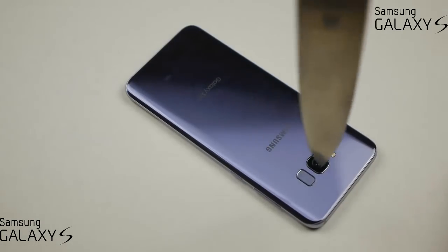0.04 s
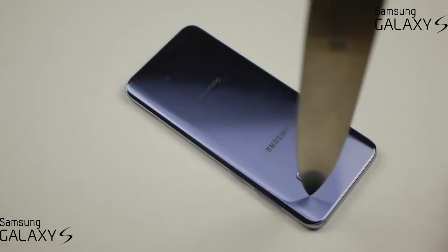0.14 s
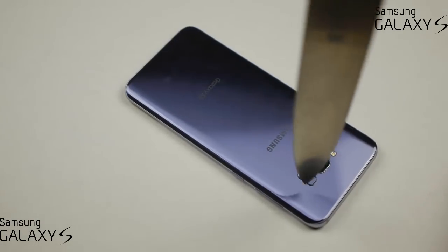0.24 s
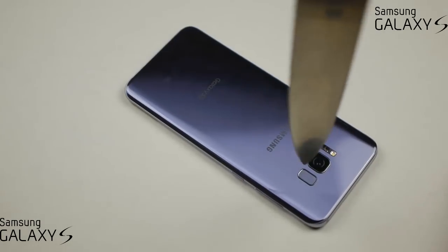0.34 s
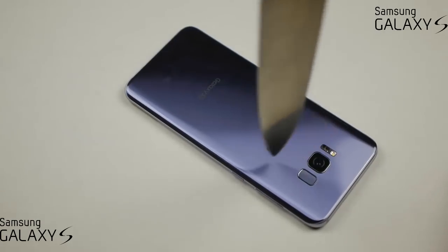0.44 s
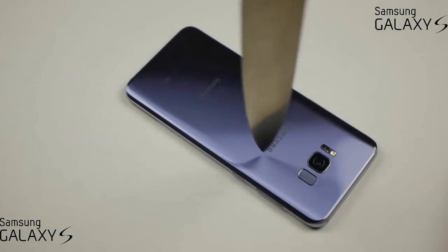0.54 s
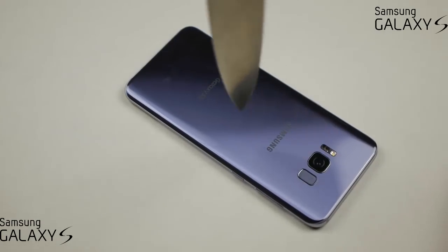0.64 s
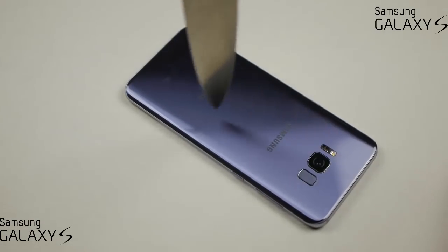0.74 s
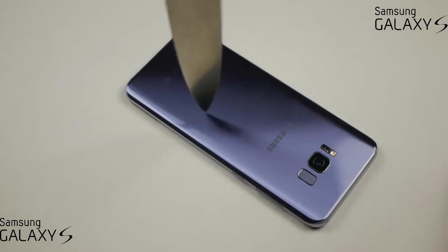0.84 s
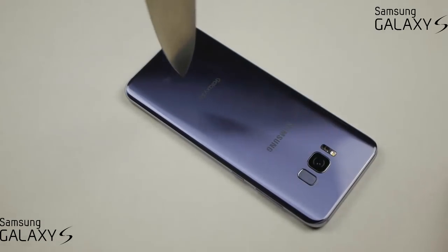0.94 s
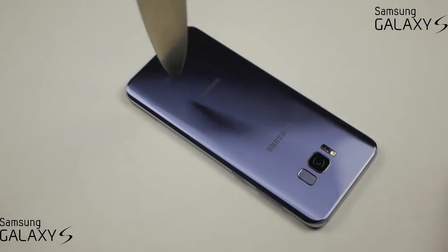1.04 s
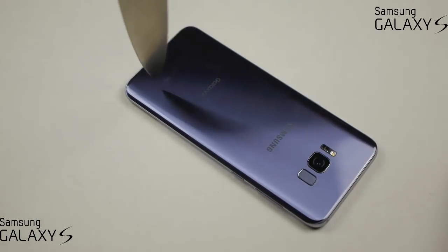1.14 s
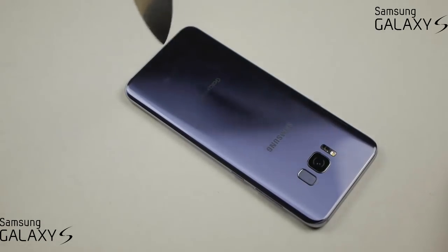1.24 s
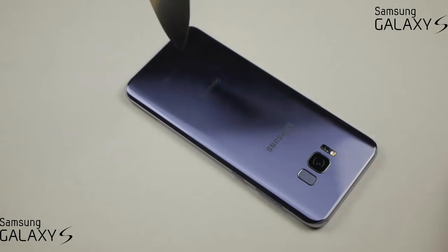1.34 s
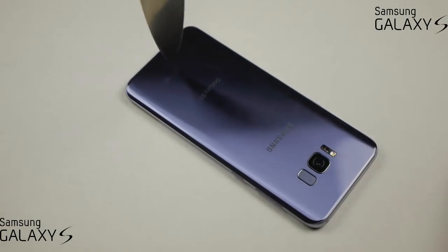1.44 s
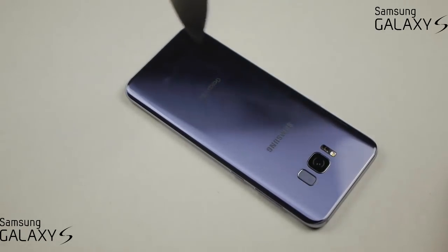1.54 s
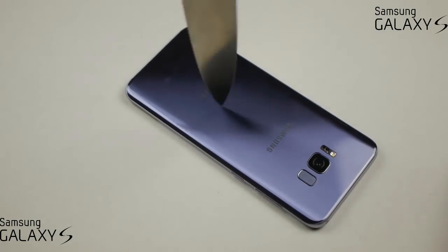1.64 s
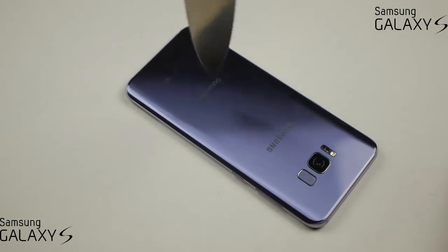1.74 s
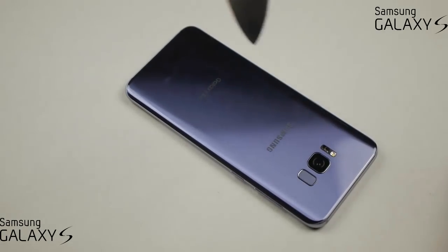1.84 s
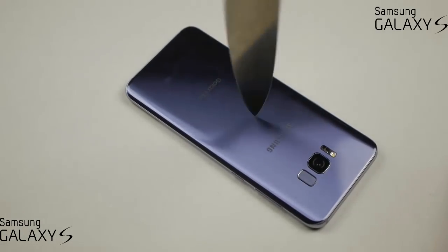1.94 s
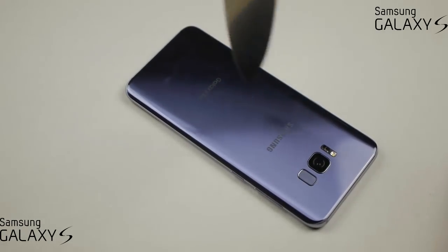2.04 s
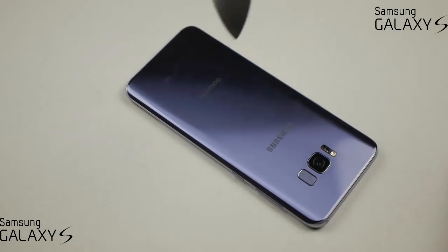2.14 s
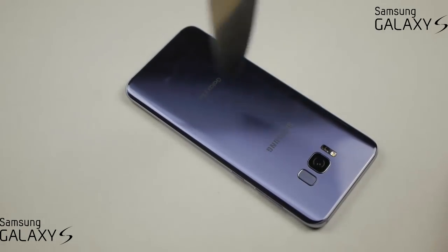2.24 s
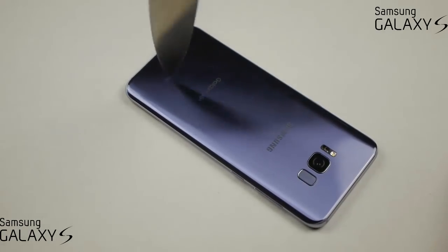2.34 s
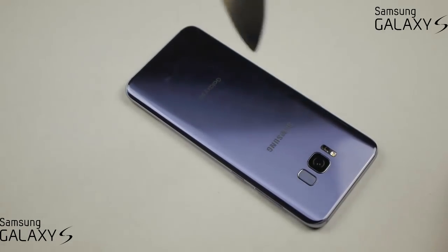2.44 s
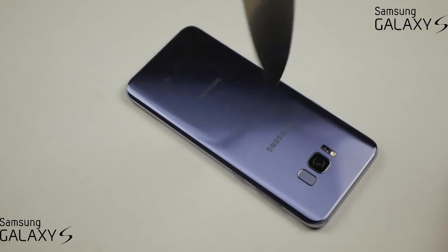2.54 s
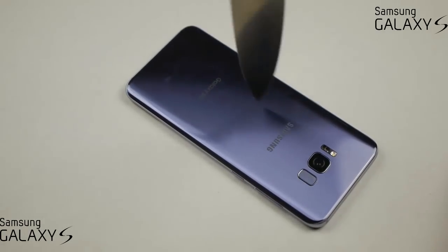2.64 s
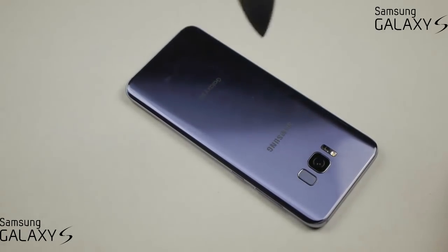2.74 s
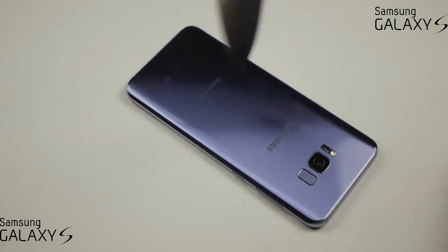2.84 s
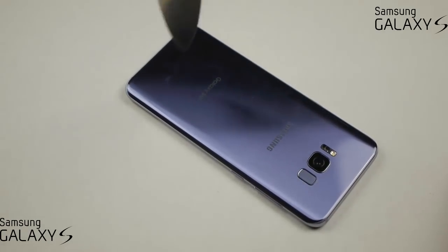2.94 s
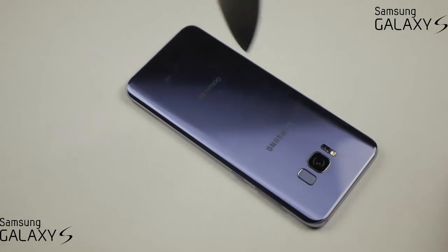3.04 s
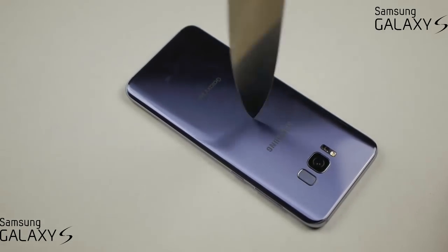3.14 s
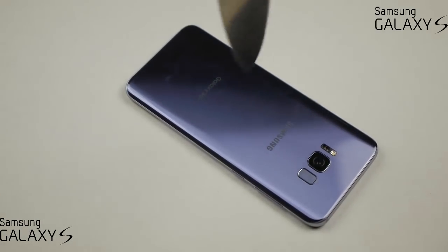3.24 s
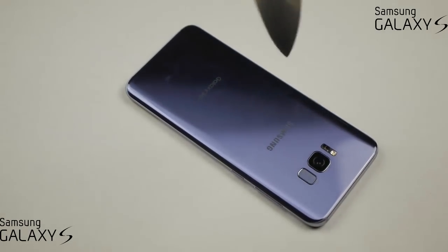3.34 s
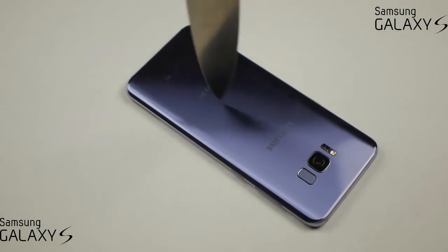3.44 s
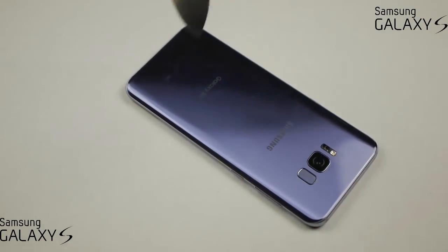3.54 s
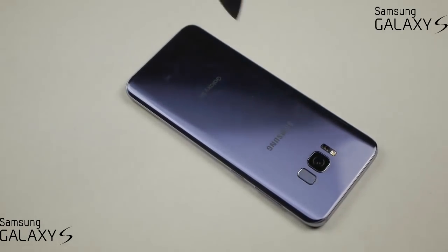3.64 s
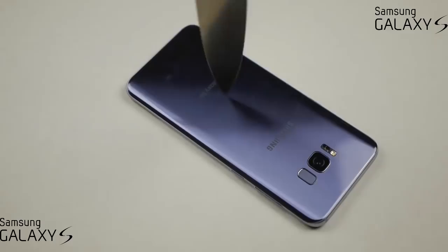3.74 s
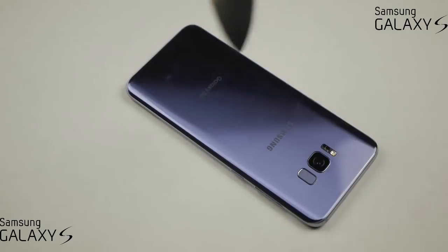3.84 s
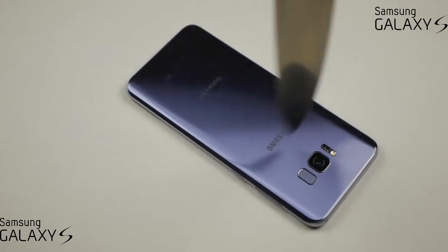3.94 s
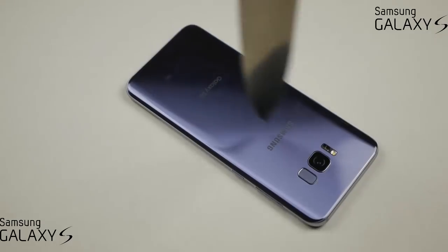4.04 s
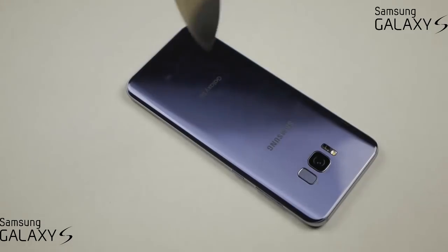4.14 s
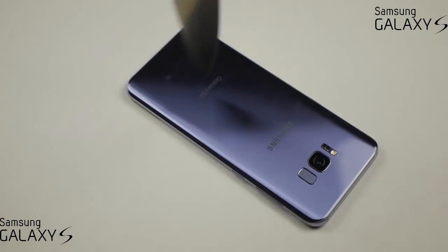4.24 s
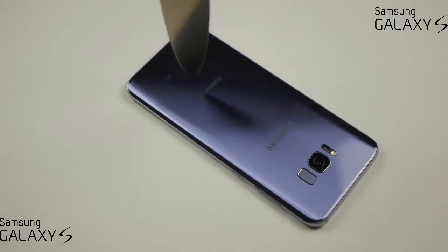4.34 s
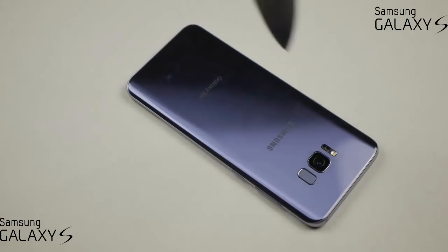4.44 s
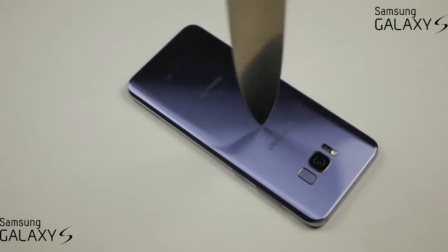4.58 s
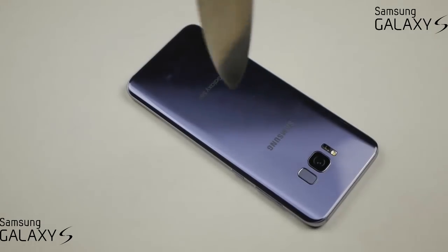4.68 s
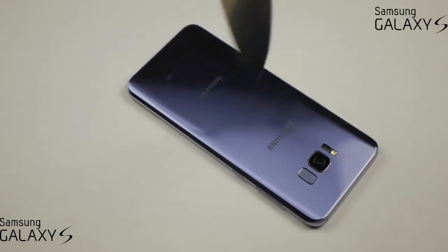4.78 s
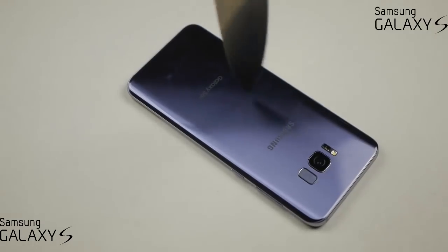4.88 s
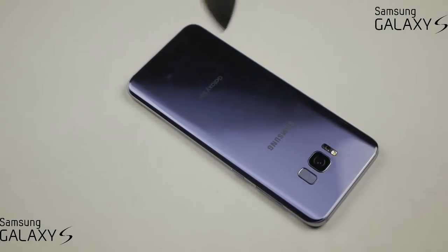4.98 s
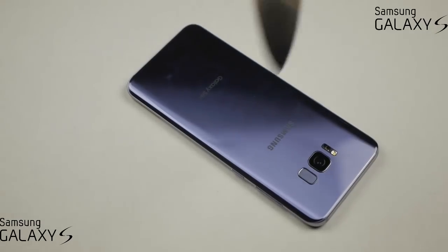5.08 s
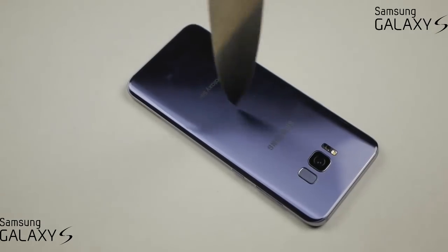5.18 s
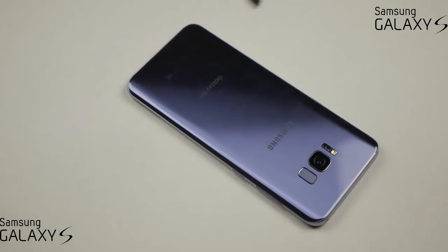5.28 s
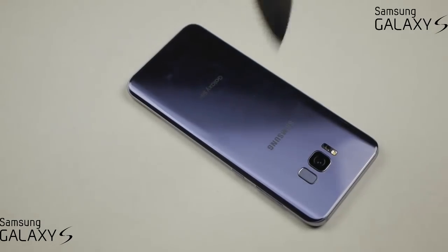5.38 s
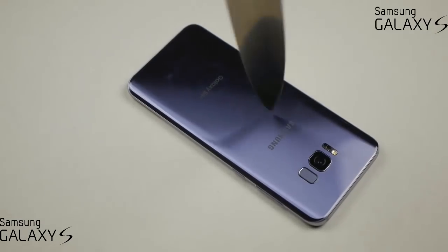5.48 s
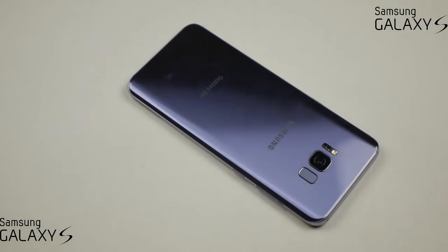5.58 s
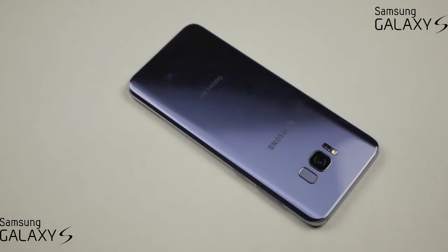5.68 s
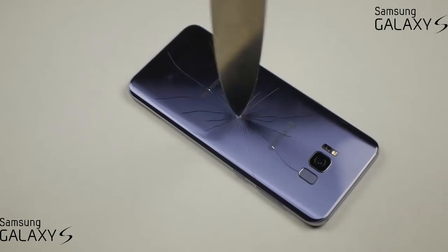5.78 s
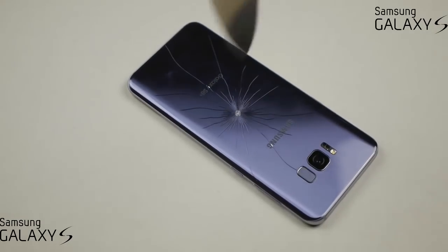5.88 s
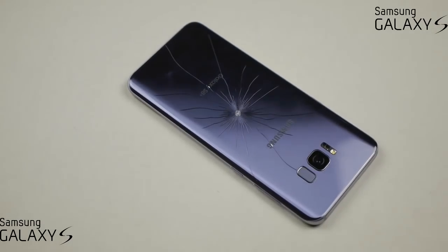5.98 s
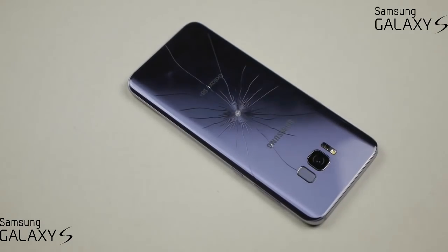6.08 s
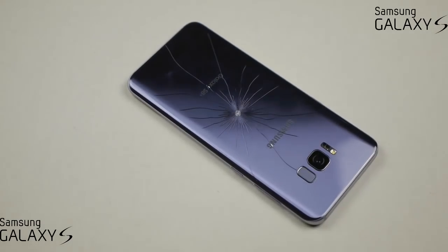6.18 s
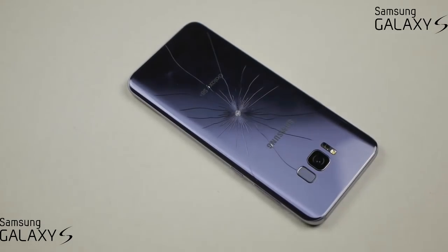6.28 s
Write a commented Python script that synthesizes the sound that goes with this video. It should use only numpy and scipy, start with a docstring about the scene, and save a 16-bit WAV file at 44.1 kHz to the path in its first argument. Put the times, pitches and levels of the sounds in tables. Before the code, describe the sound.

In a small, quiet room, closely miked in stereo, a steel knife tip raps on the glass back of a phone lying on a table. The tail of one blow is heard at 0 seconds, then duller jabs at about 0.3 and sharper ones at 0.6 and 0.9, continuing evenly every 0.3 seconds. Each is a very short, hard tick, a compact hollow thump of the tabletop slightly overloading the microphone, a brief chatter of the phone, and faint rings of case and blade, followed by short room reflections. From about 1.8 seconds the blows are fuller; from 3.8 to 5.5 they generally rattle more. At 5.87 the last jab has less thump but a harsh clatter and a bright glass snap with fine splinters; at 5.91 the crack runs on with a thin, very high ring. It fades quickly into faint room air until about 6.4.

```python
"""Small room: a steel knife tip jabs again and again at the glass back of a phone lying on a table.
Each jab is a noise tick on the glass, a table thump of dying sines that overloads the microphone,
a chattering noise buzz of the phone, and rings of its case and the blade; the room answers.
On the last blow the glass breaks with noise snaps and splinters; a moment later the crack runs on
with a thin, high ring of sines. Faint steady noise is the air of the room."""
import sys
import numpy as np
from scipy import signal
from scipy.fft import rfft, irfft
from scipy.io import wavfile
from scipy.ndimage import uniform_filter1d

SR = 44100
rng = np.random.default_rng(int(sys.argv[2]) if len(sys.argv) > 2 else 0)


def store_pcm(level_fs):
    """Save levels as 16-bit WAV."""
    pcm = np.round(np.clip(level_fs, -1, 1) * 32767).astype(np.int16)
    wavfile.write(sys.argv[1], SR, np.atleast_2d(pcm).T)


N = 278445

# Jabs, all levels relative; the lean tilts the modes and is scaled where used:
# start_s, blow_db, lean_db_per_octave, tick_db, rattle_db, favoured_hz, muted_hz
JABS = [(-0.06, -3.5, -4.5, 6, -2, 2620, 1920), (0.2654, -4.5, -9, -6.5, 5, 2650, 1740),
        (0.582, -1.9, 0, -3, -2.5, 2480, 1670), (0.876, -1.5, -1, -4.5, -3.5, 6600, 1940),
        (1.1779, -3.5, -3.5, -3, 1, 1360, 2000), (1.4728, -2, -2.5, 1.5, 3.5, 7140, 11000),
        (1.7552, 1, -0.5, 1, 0.5, 1730, 5100), (2.0585, 0, -1.5, 4.5, 2.5, 2430, 1370),
        (2.3797, 0, 0.2, 4, -1.5, 2860, 2100), (2.6761, -1, 0, 1.5, -0.5, 8800, 4000),
        (2.97, -0.5, 2, 0, -0.5, 3000, 2100), (3.2295, -0.5, -1.5, -0.5, 1, 1920, 3300),
        (3.5147, 0.2, -.5, -0.5, 1, 3950, 2950), (3.8026, -0.2, 0.5, 0.5, 4, 2200, 5400),
        (4.0832, -0.8, 0.5, -3.5, 6, 2460, 9400), (4.3727, -1, 1.9, -1, 4.5, 1720, 2870),
        (4.6509, -0.5, -2, -6.5, 2, 4600, 3030), (4.923, -0.5, -0.5, -1.5, 4.5, 1650, 2900),
        (5.2239, -0.5, -1.7, -1.5, 6, 4170, 1970), (5.5216, 0.1, -1.9, -1, 7, 4100, 2000),
        (5.8711, -4.5, 1.5, 4.5, 9, 4380, 1750)]
# Table with the phone on it: mode_hz, level_db, t60_s
TABLE_MODES = [(196.8, 5, 0.083), (251.4, 5, 0.093), (284.4, 3, 0.082), (403, 0.5, 0.041),
               (744, -9.5, 0.027)]
# Phone case: mode_hz, level_db, t60_s
CASE_MODES = [(825, -17, 0.042), (1024, -18.5, 0.024), (1421, -29.5, 0.072)]
# Knife blade, before random share and detuning: mode_hz, level_db, t60_s
BLADE_MODES = [(3900, -47, .07), (4850, -48, 0.12), (7300, -50.5, .05), (8800, -56, 0.049),
               (10231, -52, 0.076), (11200, -52, 0.065), (13484, -47, 0.041), (14867, -54.5, .07)]
# Glass splitting, relative levels: start_s, snap_db, ring_db
CRACKS = [(5.8695, -17, -15), (5.913, -26.5, 5)]
# Cracked glass: mode_hz, level_db, t60_s
GLASS_MODES = [(7779, -48, .17), (9060, -44, 0.23), (9040, -49, 0.32), (10300, -37, 0.14),
               (11460, -50, .16), (12910, -45, 0.3), (13060, -52.5, .25), (13480, -51, .22),
               (14580, -41.5, .09), (15640, -50, .06)]
# Standing waves of the room: mode_hz, level_db, t60_s
ROOM_MODES = [(131, -17, 0.14), (140.1, -20, 0.31), (156.14, -21.5, 0.31), (167.3, -16, 0.19),
              (186.7, -1.5, 0.089), (193.7, -18, 0.26), (236.8, -17.5, 0.21), (244.4, -12, 0.22),
              (271.3, -11, 0.12), (277.8, -18, 0.41), (297, -20, 0.36), (308.8, -10.5, 0.14),
              (315.1, -32, 0.86), (324.5, -7.5, 0.13), (336.5, -5, 0.12), (343, -9, 0.1), (352, -8.5, 0.23),
              (371, -5, 0.17), (387, -2.5, 0.098), (426, -36, 0.17), (412.6, -29, 0.2),
              (422.4, -28.5, 0.56), (452.2, -8, 0.09), (468, -24.5, 0.45), (476.4, -1.5, 0.085),
              (494.4, -26, 0.48), (506, -35, 0.58), (518.6, -13.5, 0.072), (554.3, -25.5, 0.2),
              (579.5, -26.5, 0.11)]
# Noise spectrum of the tip on glass, relative: freq_hz, density_db_per_hz
TICK_COLOUR = [(300, 1), (800, 5), (1800, -0.5), (3000, -7.5), (5500, -8), (9000, -6.5), (13000, -11.5),
               (15500, -10), (16500, -28.5)]
# Noise spectrum of the chattering phone, relative: freq_hz, density_db_per_hz
BUZZ_COLOUR = [(300, -22), (800, -0.5), (1200, -1), (2000, -1), (4000, -8), (7000, -10), (11000, -18),
               (15000, -19), (16500, -32.5)]
# Noise spectrum of the breaking glass, relative: freq_hz, density_db_per_hz
SNAP_COLOUR = [(1000, -10), (4000, -7), (8000, -10), (13500, 11.5), (15500, -6), (16500, -15.5)]
# Spectrum of the room's bass reflections, relative: freq_hz, density_db_per_hz
ROOM_BASS_COLOUR = [(30, -29), (85, -14), (125, -2.5), (220, 0.5), (320, 6), (480, -9), (620, -2.5),
                    (800, -8), (1100, -22.5), (1800, -22.5), (4000, -38.5)]
# Spectrum of the room's treble reflections, relative: freq_hz, density_db_per_hz
ROOM_TREBLE_COLOUR = [(400, 2), (900, 9), (1500, 3.5), (3200, 0), (5000, -5), (7000, -9.5), (10000, -16),
                      (13500, -18), (15000, -35.5), (16000, -46)]
# Spectrum of the room's steady air, relative: freq_hz, density_db_per_hz
AIR_COLOUR = [(25, -25), (110, -8), (300, -15.5), (700, -12.5), (2000, -18.5), (6000, -22.5), (12000, -28),
              (15000, -49.5)]
# Decay of the room's reflections: freq_hz, t60_s
ROOM_T60 = [(60, 0.36), (300, 0.71), (800, 0.57), (2000, 0.61), (4500, 0.55), (8000, 0.42), (11000, .33),
            (14000, 0.22)]
# Correlation of the two channels in the room's sound: freq_hz, likeness_0_to_1
ROOM_SAME = [(200, 1), (500, 0.95), (1000, 0.85), (2000, 0.4), (5000, 0.13), (12000, 0)]

EDGE_HZ = 16500
T = np.arange(round(0.7 * SR)) / SR  # time axis of one event, s
HZ = np.fft.rfftfreq(len(T), 1 / SR)

# Struck spot: favours one pitch and mutes another in the tick; the favoured one lingers in rattle and room
SPOT_PEAK_DB, SPOT_DIP_DB, SPOT_RING_DB = 9, -20, 1
TICK_TILT_DB_PER_OCTAVE, ROOM_TILT_DB_PER_OCTAVE = -1.4, -0.44
# A sharp blow on a rattling phone knocks its case harder
KNOCK_DB, KNOCK_DB_PER_RATTLE_DB, KNOCK_DB_PER_LEAN = 1.17, 0.23, 0.3
# Rattling brings out the main resonance of the glass plate
PLATE_HZ, PLATE_DB_PER_RATTLE_DB = 4160, 0.61
# The rattle feeds the room's treble
ROOM_TREBLE_DB, TREBLE_DB_PER_RATTLE_DB = -37, 0.85
BLADE_DB = 4


def jab(room_bass, blow_db, lean, tick_db, rattle_db, favoured_hz, muted_hz):
    """Tick first; the table gives way just after, the phone rattles on it, and the room answers."""
    spot_db = hump(favoured_hz, SPOT_PEAK_DB, octaves=0.19)
    spot_db += hump(muted_hz, SPOT_DIP_DB, octaves=0.21)
    plate_db = ripple() + hump(PLATE_HZ, PLATE_DB_PER_RATTLE_DB * rattle_db, octaves=0.73)
    plate_db += hump(favoured_hz, SPOT_RING_DB, octaves=0.31)
    knock_db = KNOCK_DB + KNOCK_DB_PER_RATTLE_DB * rattle_db + KNOCK_DB_PER_LEAN * lean

    out = gain_of(tick_db) * tick(tilt(TICK_TILT_DB_PER_OCTAVE) + spot_db)
    out += gain_of(rattle_db) * buzz(plate_db)
    out += gain_of(BLADE_DB) * blade()

    boom = thump(1.67 * lean) + standing_waves(1.03 * lean)
    add(out, 0.00088, gain_of(blow_db) * boom + gain_of(knock_db) * case_knock())

    treble_db = ROOM_TREBLE_DB + TREBLE_DB_PER_RATTLE_DB * rattle_db
    room_treble = reverberation(ROOM_TREBLE_COLOUR, wait_s=0.0039, rise_s=0.005,
                                extra_db=plate_db + tilt(ROOM_TILT_DB_PER_OCTAVE))
    out += gain_of(blow_db + 1.1 * knock_db) * room_bass
    return out + gain_of(treble_db) * room_treble


def thump(lean_db_per_octave, corner_hz=331):
    """The table top swings; it radiates its lowest modes poorly, hence the high-pass."""
    highpass = signal.butter(2, corner_hz, "high", fs=SR, output="sos")
    return signal.sosfilt(highpass, ring(TABLE_MODES, lean_db_per_octave))


def tick(colour_db, contact_s=0.00048, t60_s=0.0076, gain_db=-8.0):
    """The tip skids on the glass for under a millisecond; the noise then dies away."""
    contact = np.minimum(fade(t60_s) * np.exp(np.log(1000) * contact_s / t60_s), 1)
    return gain_of(gain_db) * noise(TICK_COLOUR, same=0.82, extra_db=colour_db) * contact


def buzz(colour_db, gain_db=-19, t60_s=0.033, bounce_hz=310, depth=0.82):
    """The phone chatters against the swinging table top: noise pulsing at the bounce rate."""
    chatter = 1 + depth * np.cos(2 * np.pi * bounce_hz * T)
    envelope = swell(wait_s=0.00069, rise_s=0.002) * fade(t60_s)
    return gain_of(gain_db) * noise(BUZZ_COLOUR, same=0.4, extra_db=colour_db) * chatter * envelope


def case_knock():
    """The struck phone case rings briefly in its own modes."""
    return ring(CASE_MODES)


def blade(detune=0.0024):
    """Each jab's angle on the blade shares the force differently and loads the modes a little."""
    draws = rng.standard_normal((len(BLADE_MODES), 2))
    out = 0
    for (hz, db, t60_s), (share, load) in zip(BLADE_MODES, draws):
        out = out + share * ring([(hz * (1 + detune * load), db, t60_s)])
    return out


def crack(snap_db, ring_db, t60_s=0.027, splinters_per_s=800, splinters_db=-4,
          splinters_t60_s=0.09, room_db=-23):
    """A bright snap and a spray of tiny fractures set the split glass ringing."""
    is_break = rng.random(len(T)) < splinters_per_s / SR
    breaks = is_break * rng.standard_normal(len(T)) * fade(splinters_t60_s)
    splinter = noise(SNAP_COLOUR, same=0.6) * fade(0.001)
    splinters = signal.oaconvolve(splinter, breaks[None], axes=1)[:, :len(T)]
    snap = noise(SNAP_COLOUR, same=0.65) * fade(t60_s) + gain_of(splinters_db) * splinters
    # extra fade: this tail dies faster than ROOM_T60
    snap += gain_of(room_db) * reverberation(SNAP_COLOUR, wait_s=0.0044, rise_s=0.004) * fade(0.6)
    return gain_of(snap_db) * snap + gain_of(ring_db) * ring(GLASS_MODES)


def standing_waves(lean_db_per_octave, spread_db=1.0):
    """Room modes build up over a few crossings; neighbouring ones favour opposite channels."""
    even = ring(ROOM_MODES[::2], lean_db_per_octave)
    odd = ring(ROOM_MODES[1::2], lean_db_per_octave)
    sides_db = spread_db * np.array([[1], [-1]]) / 2
    return (gain_of(sides_db) * even + gain_of(-sides_db) * odd) * swell(wait_s=0.0083, rise_s=0.01)


def reverberation(colour, wait_s, rise_s, extra_db=0):
    """Dense reflections as noise, each band dying at its own speed."""
    reflections = noise(colour, read(ROOM_SAME, HZ), extra_db)
    hz, t, bands = signal.stft(reflections, SR, nperseg=256)
    bands = bands * np.exp(-np.log(1000) * t / read(ROOM_T60, hz)[:, None])
    return signal.istft(bands, nperseg=256)[1][:, :len(T)] * swell(wait_s, rise_s)


def room_tone(gain_db=-64):
    """Faint steady air of the room."""
    same = read(ROOM_SAME, np.fft.rfftfreq(N, 1 / SR))
    return gain_of(gain_db) * noise(AIR_COLOUR, same, size=N)


def ring(modes, lean_db_per_octave=0, pivot_hz=270):
    """Dying sines; the lean favours the modes above or below the pivot."""
    out = 0
    for hz, db, t60_s in modes:
        gain = gain_of(db + lean_db_per_octave * np.log2(hz / pivot_hz))
        out = out + gain * fade(t60_s) * np.sin(2 * np.pi * hz * T)
    return out


def noise(colour, same, extra_db=0, size=len(T)):
    """Two channels of coloured noise with correlation same; rms 1 before the extra colour."""
    gain = gain_of(read(colour, np.fft.rfftfreq(size, 1 / SR)))
    mid, side = rfft(rng.standard_normal((2, size))) * gain / np.sqrt(2 * np.mean(gain ** 2))
    same = np.clip(same, -1, 1)
    mid, side = mid * np.sqrt(1 + same), side * np.sqrt(1 - same)
    return irfft(np.array([mid + side, mid - side]) * gain_of(extra_db), size)


def hump(hz, height_db, octaves):
    """A broad resonance, or a dip, as a bell curve in dB."""
    return height_db * np.exp(-(np.log2((HZ + 1) / hz) / octaves) ** 2)


def ripple(depth_db=2.5, size=60):
    """Every spot favours other plate modes: narrow random hills along the frequency axis, in dB."""
    hills = uniform_filter1d(rng.standard_normal(len(HZ)), size)
    hills = uniform_filter1d(hills, size)
    return depth_db * hills / hills.std()


def tilt(db_per_octave, knee_hz=1900):
    """A treble slope in dB, zero at 4500 Hz and level below the knee."""
    return db_per_octave * np.log2(np.maximum(HZ, knee_hz) / 4500)


def fade(t60_s):
    """Free decay, 60 dB in t60_s."""
    return np.exp(-np.log(1000) * T / t60_s)


def swell(wait_s, rise_s):
    """Nothing until wait_s, then a straight rise to 1."""
    return np.clip((T - wait_s) / rise_s, 0, 1)


def gain_of(db):
    """Amplitude factor of a level in dB."""
    return 10 ** (np.asarray(db) / 20)


def read(points, hz):
    """Straight lines between points on a log-frequency axis."""
    f, value = np.transpose(points)
    return np.interp(np.log(hz + 1), np.log(f + 1), value)


def add(mix, start_s, sound):
    """Mixes a sound in at start_s; a negative start drops its beginning."""
    start = round(start_s * SR)
    sound = sound[..., max(-start, 0):]
    part = mix[:, max(start, 0):][:, :sound.shape[-1]]
    part += sound[..., :part.shape[1]]


def scene():
    """Jabs and cracks over the quiet room."""
    mix = room_tone()
    # long waves take the same paths through the room on every jab
    room_bass = gain_of(-25.0) * reverberation(ROOM_BASS_COLOUR, wait_s=0.005, rise_s=0.0077)
    for start_s, *blow in JABS:
        add(mix, start_s, jab(room_bass, *blow))
    for start_s, snap_db, ring_db in CRACKS:
        add(mix, start_s, crack(snap_db, ring_db))
    return mix * gain_of([[-0.2], [0.2]])  # channel balance, dB


def record(dry, ceiling=1.0):
    """The first swings of each thump overload the input softly; then the band limit."""
    squashed = ceiling * np.tanh(dry / ceiling)
    lowpass = signal.firwin(301, EDGE_HZ, window=("kaiser", 9), fs=SR)
    return signal.oaconvolve(squashed, lowpass[None], "same")


dry = scene()
out = record(dry)
store_pcm(out)
```